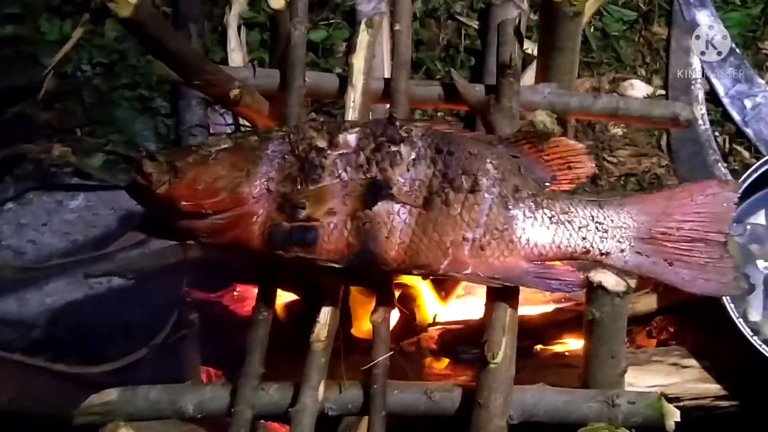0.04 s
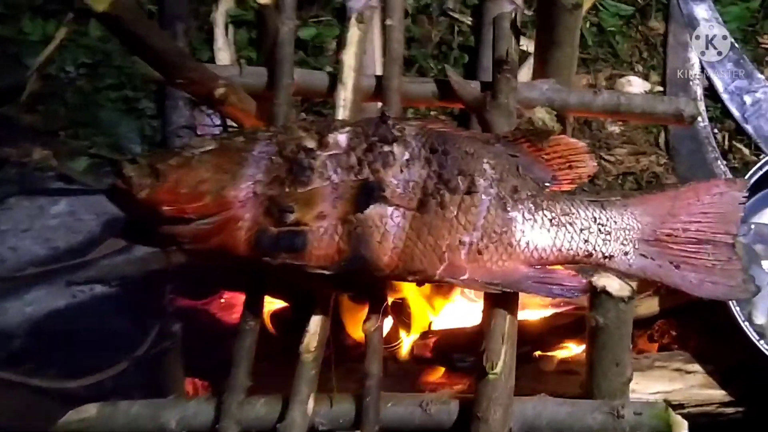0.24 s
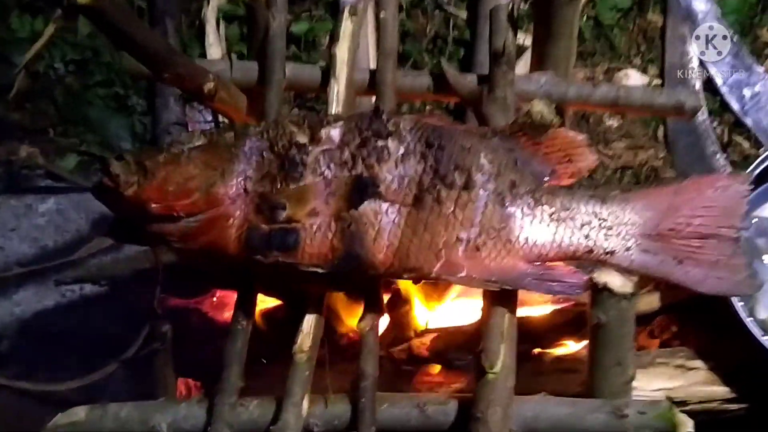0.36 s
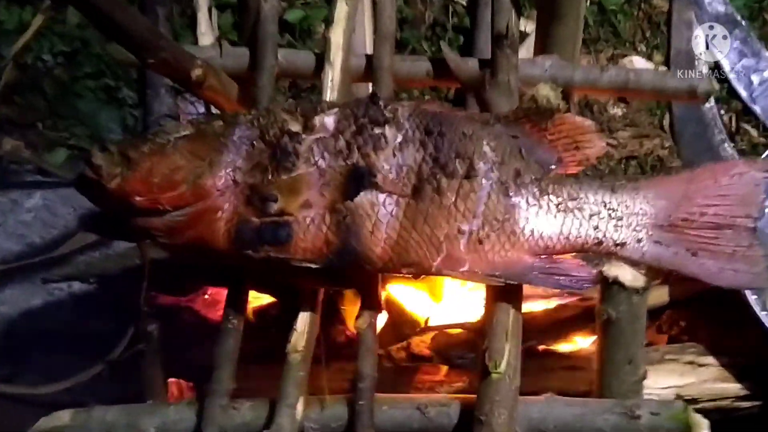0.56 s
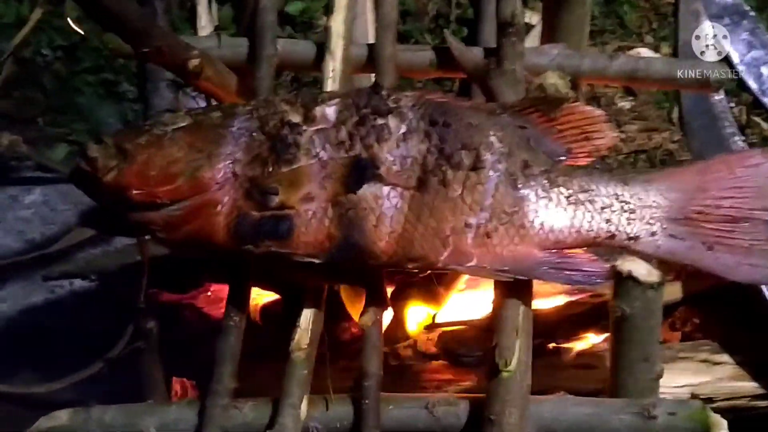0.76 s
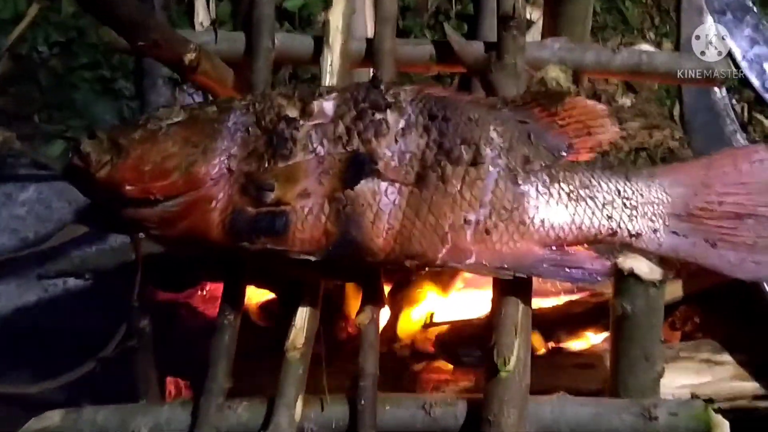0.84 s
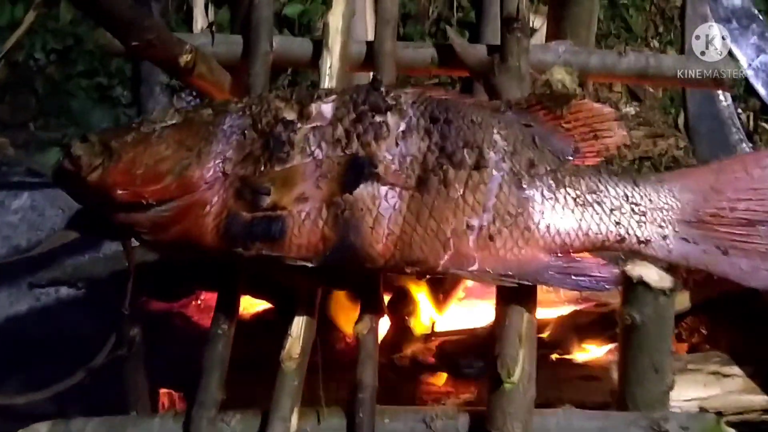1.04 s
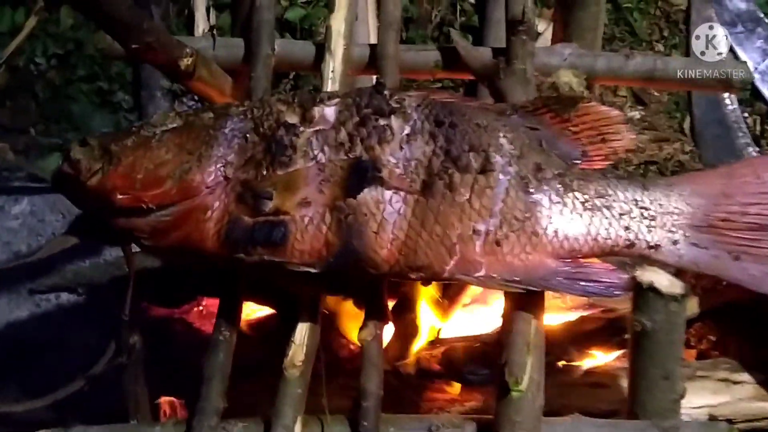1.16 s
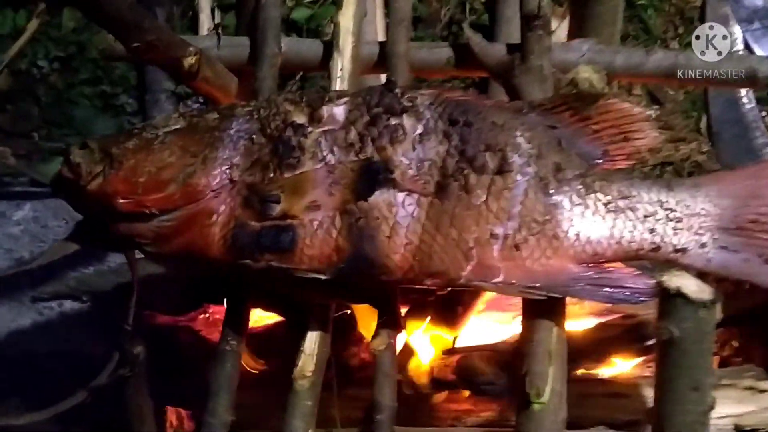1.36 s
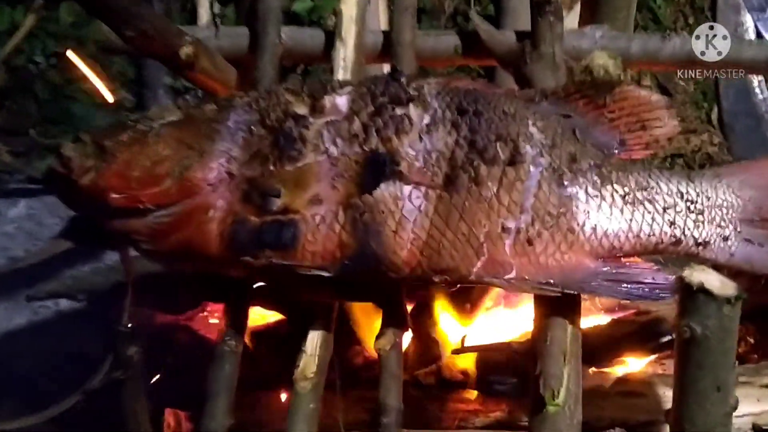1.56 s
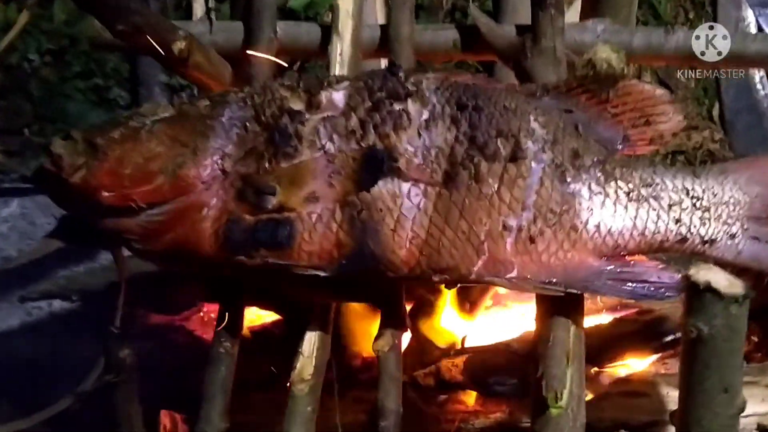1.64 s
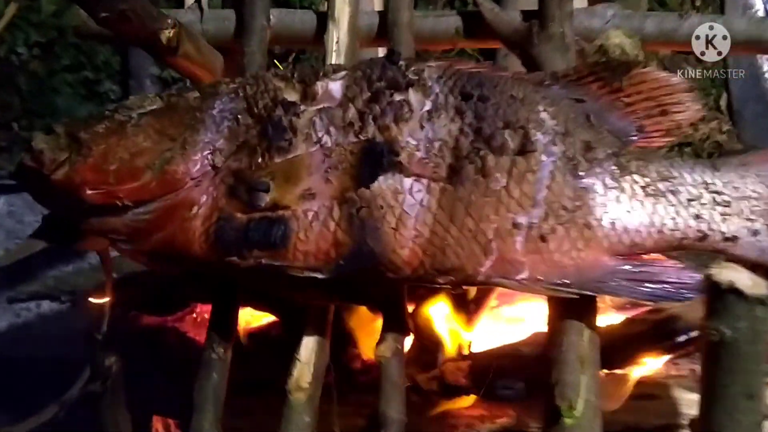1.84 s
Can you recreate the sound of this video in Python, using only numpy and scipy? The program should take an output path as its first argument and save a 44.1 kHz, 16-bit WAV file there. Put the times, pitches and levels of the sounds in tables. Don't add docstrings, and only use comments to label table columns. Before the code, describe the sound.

A wood fire pops and crackles an arm's length from a small microphone outdoors: early sharp snaps, a sparser middle, then a loud cluster with hissing gas, over soft flame rumble and faint insects.

```python
import sys
import numpy as np
from scipy import signal
from scipy.fft import rfft, irfft
from scipy.io import wavfile

SR = 44100
rng = np.random.default_rng(int(sys.argv[2]) if len(sys.argv) > 2 else 0)


def boost_factor(decibels):
    exponent = np.asarray(decibels, float) / 20
    return 10 ** exponent


def digitize_waveform(pressure):
    field = np.atleast_2d(pressure).T
    bounded = np.clip(field, -1, 1)
    quanta = np.round(bounded * 32767).astype(np.int16)
    wavfile.write(sys.argv[1], SR, quanta)


N = 83790

# pitch_hz, level_db
FLAME_SPECTRUM = [(18, -75), (30, -56), (54, -27), (69, -13.5), (118, 2.5), (257, -10), (362, -22.5),
                  (429, -18.5), (900, -56), (1170, -74.5), (1980, -120)]
# pitch_hz, level_db
AIR_SPECTRUM = [(290, -15), (500, 9), (2810, -0.5), (3860, -4.5), (4400, 6.5), (4930, -52), (6030, -2),
                (7600, -13), (15600, -6)]
# pitch_hz, width_hz, level_db
INSECT_BANDS = [(2770, 270, -81.5), (4533, 110, -80), (5530, 400, -78.5), (6015, 550, -72),
                (14700, 1600, -79.5), (9050, 4900, -76.5), (10270, 840, -76.5)]
# pitch_hz, level_db
BLOW_SPECTRUM = [(180, -47.5), (300, -16), (464, -7), (601, -10), (1800, -3.5), (2000, -1.5), (4240, -27),
                 (4600, -15), (5000, -40), (6500, -60), (11000, -120)]
# time_s, level_db
GAS_FLOW = [(0, -76.5), (.3, -78), (.38, -64), (.5, -72.5), (.66, -78), (1.25, -72.5), (1.38, -58.5),
            (1.5, -61), (1.65, -59.5), (1.72, -57), (1.8, -59), (1.9, -71)]
# pitch_hz, width_hz, level_db
BARK_WHISTLES = [(614, 39, -14), (1107, 44, -20.5), (2027, 44, -16.5), (2400, 74, -13), (2763, 110, -21.5)]
# dip_s, push_peak_db, push_pitch_hz, log_ring_db
POCKET_BURSTS = [(0.2475, -34.5, 1110, 12.5), (.2488, -38, 1080, 2), (0.2478, -41, 480, -4),
                 (.2766, -53, 1040, 0), (0.3106, -16.5, 990, 4), (0.353, -47.5, 1210, -2),
                 (0.5443, -51, 1040, 7), (0.5845, -39.5, 790, 0), (0.615, -37, 1010, -5),
                 (0.6197, -34.5, 980, 2), (0.9099, -42, 895, 4.5), (0.9445, -39, 860, 4.5),
                 (1.0201, -34.5, 1020, 3.5), (1.207, -47, 453, -1), (1.2559, -39, 710, 1),
                 (1.3067, -21, 675, -7), (1.3105, -32.5, 680, -9), (1.3186, -22, 1070, -2.5),
                 (1.368, -61, 1000, 0), (1.379, -34, 644, -14), (1.3836, -14, 810, -11),
                 (1.3873, -27, 690, -13), (1.4886, -47, 800, -3), (1.5677, -40, 700, -8),
                 (1.706, -51, 810, -4), (1.7447, -46.5, 666, -3), (1.859, -43, 824, -13),
                 (1.8767, -40.5, 910, -4)]
# pitch_hz, width_hz, level_db
LOG_MODES = [(505, 130, -15), (606, 60, -25), (990, 155, -5)]
# peak_s, peak_db, lower_mode_hz, upper_mode_hz, upper_mode_db
WOOD_RINGS = [(0.247, -27.5, 1930, 2320, -1), (.2482, -33, 3100, 3450, -5), (.2585, -40, 2040, 2600, -10),
              (0.2756, -38.5, 1950, 2800, -6), (0.3106, -17, 1927, 2890, -3), (.3125, -28, 2330, 3300, -3),
              (.3205, -29, 2370, 3650, 6), (0.3546, -30.5, 2230, 2820, 5), (0.5076, -41.5, 1840, 2480, -3),
              (.509, -46, 2890, 3300, -4.5), (0.544, -42, 1930, 2510, 6), (.5845, -45, 1850, 2400, 7),
              (0.6134, -40, 1850, 2380, 2), (0.6188, -41.5, 1700, 2510, 9), (.699, -58, 2080, 2400, -11),
              (.91, -45, 2100, 2650, -3), (0.9446, -30, 1750, 2290, 8.5), (.946, -42.5, 2800, 3310, 0),
              (1.0197, -33, 1790, 2265, 4), (1.021, -44.5, 2720, 3130, -7), (1.206, -47, 2000, 2590, -5),
              (1.2065, -51, 3320, 3780, 2), (1.256, -38, 1740, 2230, 1), (1.257, -42, 2610, 3300, 3),
              (1.3068, -34, 2300, 2850, -6), (1.3185, -22.5, 1790, 2130, 1), (1.319, -29, 2770, 3310, -10),
              (1.367, -43, 2180, 2800, -9), (1.3837, -22, 2365, 2740, -6.5), (1.3858, -32, 1590, 2100, -2),
              (1.386, -30.5, 2830, 3460, 0), (1.488, -43.5, 2050, 2470, 0), (1.5667, -35, 1670, 2430, 2.5),
              (1.5675, -38.5, 1200, 1980, 9), (1.568, -48, 2770, 3200, -3), (1.7455, -46, 2400, 3360, -4),
              (1.859, -38.5, 2210, 2960, 1), (1.877, -38.5, 2120, 2560, -9), (1.878, -42.5, 1380, 2920, -7)]
# start_s, hiss_db, length_s, low_part_db, shrill_part_db
GAS_JETS = [
    (0.2465, -36, 0.047, -3.5, 0.5),
    (0.311, -27.5, 0.063, -3.5, -9),
    (0.351, -45, 0.021, 6.5, 14),
    (0.6184, -44.5, 0.044, 2, -1),
    (0.945, -39, 0.048, -5.5, 6),
    (1.254, -45.5, 0.051, -1, 8),
    (1.3175, -36, 0.042, 2, -1),
    (1.383, -29, 0.054, -2.5, -5.5),
]
# pitch_hz, level_db
JET_LOW_SPECTRUM = [(88, -33), (150, 2.5), (894, -1), (1210, 1), (1540, -1), (2940, 1.5), (4610, -10),
                    (4990, -28), (7000, 0), (9100, -45), (15400, -120)]
# pitch_hz, level_db
JET_TOP_SPECTRUM = [(2350, -9), (4000, -2.5), (5020, -7), (6310, -8.5), (8150, 0), (11800, -12.5),
                    (13500, -13.5), (14900, -5.5), (15600, 1)]
# start_s, hiss_db, length_s, low_part_db, shrill_part_db
FAINT_PUFFS = [(0.273, -54.5, 0.073, 2.5, 13.5), (0.508, -49, 0.037, 1, 9), (1.366, -50.5, 0.038, -1, 9),
               (1.746, -52, 0.037, 0.5, 9.5), (1.859, -49.5, 0.042, 2, 9.5), (0.519, -54, 0.016, -14, 4),
               (0.5437, -56, 0.019, 7.5, 9), (0.589, -68, 0.034, 9.5, 4), (0.614, -55, 0.0049, 3, 10),
               (0.693, -71, 0.054, 10.5, 3), (0.871, -62.5, 0.019, 1, 7.5), (0.908, -52, 0.054, 3, 0),
               (1.02, -52.5, 0.0075, -10, 15.5), (1.023, -58.5, 0.041, 5, 6), (1.207, -69, 0.033, 4, 8),
               (1.3056, -54, 0.029, 10, 4), (1.489, -57, 0.054, 1.5, 8), (1.567, -53.5, 0.016, -1, 12),
               (1.576, -70, 0.051, 15, -1), (1.704, -64, 0.032, 11.5, 6), (1.874, -51, 0.081, 1.5, 4)]
# start_s, level_db
LOG_THUDS = [
    (0.3106, -60.5),
    (1.3075, -22),
    (1.382, -22.5),
]
# start_s, level_db
BIRD_CHIPS = [
    (.672, -69),
    (.83, -72),
    (.872, -69),
    (.915, -71),
    (1.115, -69),
    (1.158, -69),
    (1.203, -70),
    (1.445, -67),
    (1.49, -67),
]
# start_s, length_s, level_db, pitch_hz
SAP_SQUEAKS = [
    (0.702, .016, -65, 2170),
    (1.576, .024, -55, 1140),
    (1.604, 0.018, -58, 2010),
    (1.708, .022, -58, 2490),
    (1.727, .022, -60, 676),
    (1.812, 0.024, -60, 725),
]

PUSH_LEAD_S, RING_LEAD_S = 2 / 1000, 0.0006


def evened(x):
    return x / np.sqrt(np.mean(x ** 2) + 1e-20)


def coloured(points, size=N):
    f, db = np.transpose(points)
    hz = np.fft.rfftfreq(size, 1 / SR)
    gain = boost_factor(np.interp(np.log(hz + 1), np.log(f + 1), db, left=-80))
    return evened(irfft(rfft(rng.standard_normal(size)) * gain, size))


def drift(per_s, size=N):
    settle = 4000
    low_pass = signal.butter(2, per_s, fs=SR)
    return evened(signal.lfilter(*low_pass, rng.standard_normal(size + settle))[settle:])


def resonate(x, hz, width):
    turn = np.exp(2j * np.pi * hz * np.arange(len(x)) / SR)
    r = np.exp(-np.pi * width / SR)
    return 2 * (turn * signal.lfilter([1 - r], [1, -r], x / turn)).real


def narrow_noise(hz, width):
    once = resonate(rng.standard_normal(N), hz, width)
    return evened(resonate(once, hz, width))


def band(x, edges, kind):
    return signal.sosfilt(signal.butter(4, edges, kind, fs=SR, output="sos"), x)


def add(mix, s, sound):
    part = mix[round(s * SR):][:len(sound)]
    part += sound[:len(part)]


def flame():
    return boost_factor(-59 + 1.23 * drift(11.0)) * coloured(FLAME_SPECTRUM)


def forest():
    throb_per_s, throb_db = 45, 1.1
    out = boost_factor(-75.5 + 2.0 * drift(7.5)) * coloured(AIR_SPECTRUM)
    for hz, width, db in INSECT_BANDS:
        choir = narrow_noise(hz, width)
        out = out + boost_factor(db + throb_db * drift(throb_per_s)) * choir
    return out


def blowing_log():
    flutter_per_s, flutter_db, fizz_db = 12.5, 4.5, -9.5
    s, db = np.transpose(GAS_FLOW)
    rush = coloured(BLOW_SPECTRUM)
    low = band(rush, 1260, "low") * boost_factor(2.45 * drift(40))
    high = band(rush, 1920, "high") * boost_factor(0.47 * drift(64))
    for hz, width, whistle_db in BARK_WHISTLES:
        flutter = boost_factor(whistle_db + flutter_db * drift(flutter_per_s))
        high = high + flutter * narrow_noise(hz, width)
    fizz = boost_factor(fizz_db) * band(rng.standard_normal(N), 6000, "high")
    flow = boost_factor(np.interp(np.arange(N) / SR, s, db))
    return flow * (low + high + fizz)


def pop(push_db, hz, log_db):
    push_cycles = 0.65
    lean = 0.15
    t = np.arange(3000) / SR
    u = (t - PUSH_LEAD_S) * hz
    swell = np.exp(-(u / push_cycles) ** 2 * 2) * (1 - lean * np.tanh(2 * u))
    push = -np.cos(2 * np.pi * u) * swell
    body = sum(boost_factor(db + 3 + log_db) * resonate(push, f, w) for f, w, db in LOG_MODES)
    return boost_factor(push_db) * (push + body)


def ring(peak_db, low_hz, up_hz, up_db):
    rise_s, upper_lag_s, width_hz = 0.000788, 0.000579, 307
    splinter_s, splinter_db = 0.016, -18.5
    t = np.arange(2000) / SR
    envelope = np.exp(-t / splinter_s) * (1 - np.exp(-t / rise_s))
    splinters = boost_factor(splinter_db) * envelope * rng.standard_normal(len(t))
    out = 0
    for hz, db, at in ((low_hz, 0, rise_s), (up_hz, up_db, rise_s + upper_lag_s)):
        knock = -np.exp(-((t - at) / rise_s) ** 2 * 3) * np.cos(2 * np.pi * hz * (t - at))
        mode = resonate(knock + splinters, hz, 3 * width_hz)
        out = out + boost_factor(db) * resonate(mode, hz, width_hz)
    return boost_factor(peak_db) * out / abs(out).max()


def jet(hiss_db, length, low_db, shrill_db):
    size = 6000
    split_hz, shrill_hz = 4880, 12300
    low_sputter_db, mid_sputter_db, shrill_sputter_db = 1.5, 1.3, 4.5
    rise_s, low_rise_s = 0.00063, 0.0027
    low_fade_db, fade_db, fade_bend = -32.5, -24, 1.5
    crack_lag_s, crack_s, crack_db = 0.0022, 0.0011, 3.5
    t = np.arange(size) / SR
    u = t / max(length, 0.005)
    rise = 1 - np.exp(-(t / rise_s) ** 2)
    low = band(coloured(JET_LOW_SPECTRUM, size), split_hz, "low")
    top = band(coloured(JET_TOP_SPECTRUM, size), split_hz, "high")
    mid = band(top, shrill_hz, "low") * boost_factor(mid_sputter_db * drift(260, size))
    shrill = band(top, shrill_hz, "high") * boost_factor(shrill_db + shrill_sputter_db * drift(330, size))
    low = low * boost_factor(low_db + low_fade_db * u + low_sputter_db * drift(130, size))
    low = low * (1 - np.exp(-(t / low_rise_s) ** 2))
    crack = band(rng.standard_normal(size), [5000, 8500], "band")
    crack = boost_factor(crack_db) * np.exp(-((t - crack_lag_s) / crack_s) ** 2) * crack
    treble = (mid + shrill) * boost_factor(fade_db * u ** fade_bend)
    return boost_factor(hiss_db) * rise * (treble + low + crack)


def puff(*row):
    spit_s, spit_db = 0.0011, 6.5
    sound = jet(*row)
    t = np.arange(len(sound)) / SR
    return sound * (1 + boost_factor(spit_db) * np.exp(-(t / spit_s) ** 2))


def thud(db):
    pitch_hz, decay_s, rise_s = 174, 0.0052, 0.0072
    t = np.arange(3000) / SR
    envelope = np.exp(-t / decay_s) * (1 - np.exp(-t / rise_s))
    return -boost_factor(db) * np.sin(2 * np.pi * pitch_hz * t) * envelope


def chip(db):
    length_s, from_hz, to_hz, blur_hz = 0.024, 5600, 4750, 70
    u = np.arange(0, length_s, 1 / SR) / length_s
    hz = from_hz + (to_hz - from_hz) * u + blur_hz * drift(400, len(u))
    return boost_factor(db) * np.sin(np.pi * u) * np.sin(2 * np.pi * np.cumsum(hz) / SR)


def squeak(length, db, hz):
    sag = 0.062
    u = np.arange(0, length, 1 / SR) / length
    phase = 2 * np.pi * np.cumsum(hz * (1 - sag * u)) / SR
    return boost_factor(db) * np.sin(np.pi * np.sqrt(u)) * np.sin(phase)


def scene():
    echo_s, echo_share = 0.001366, 0.079
    low_cut_hz = 98
    knocks, gas = np.zeros(N), np.zeros(N)
    layers = (
        (knocks, POCKET_BURSTS, pop, PUSH_LEAD_S),
        (knocks, WOOD_RINGS, ring, RING_LEAD_S),
        (gas, LOG_THUDS, thud, 0),
        (gas, GAS_JETS, jet, 0),
        (gas, FAINT_PUFFS, puff, 0),
        (gas, BIRD_CHIPS, chip, 0),
        (gas, SAP_SQUEAKS, squeak, 0),
    )
    for mix, table, source, lead in layers:
        for s, *row in table:
            add(mix, s - lead, source(*row))
    knocks = knocks - echo_share * np.roll(knocks, round(echo_s * SR))
    events = band(knocks + gas, low_cut_hz, "high")
    return (events + flame() + forest() + blowing_log())[None]


def top_cut(x):
    return signal.sosfilt(signal.butter(12, 16790, fs=SR, output="sos"), x)


def record(dry):
    edge_hz, above_db = 15650, -44
    low_pass = signal.firwin(401, edge_hz, window=("kaiser", 7), fs=SR)
    kept = signal.oaconvolve(dry, low_pass[None], "same")
    return top_cut(kept + boost_factor(above_db) * (dry - kept))


dry = scene()
out = record(dry)
digitize_waveform(out)
```